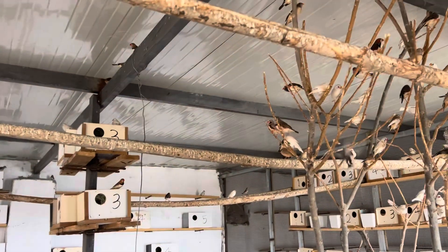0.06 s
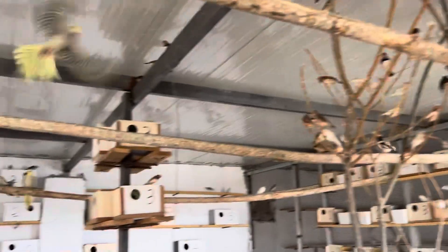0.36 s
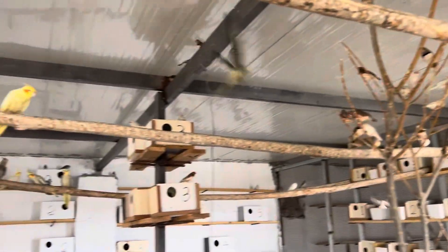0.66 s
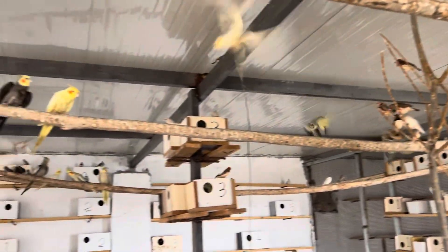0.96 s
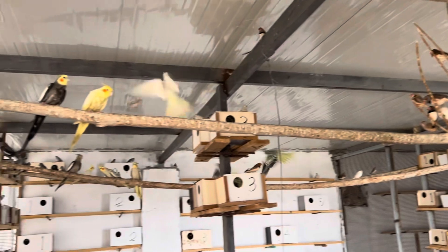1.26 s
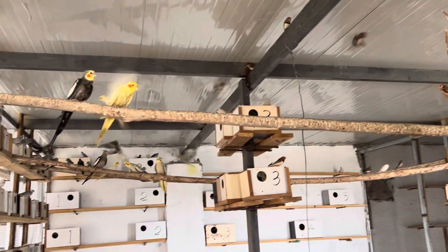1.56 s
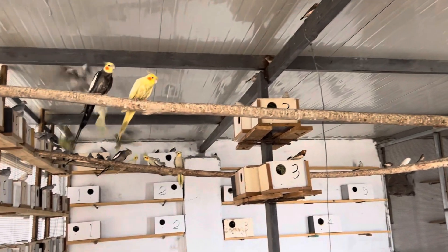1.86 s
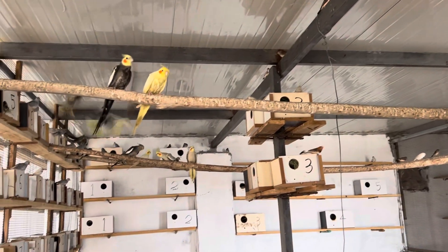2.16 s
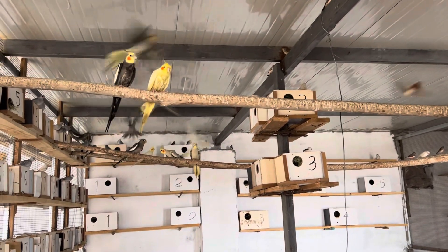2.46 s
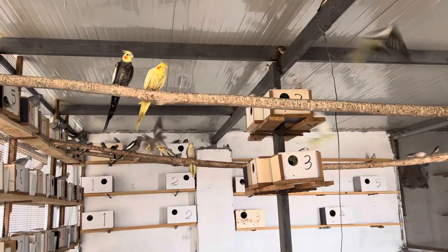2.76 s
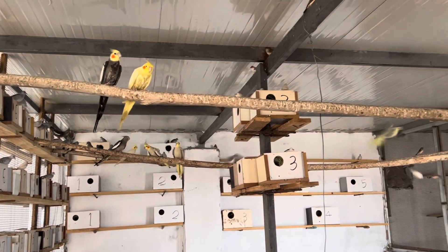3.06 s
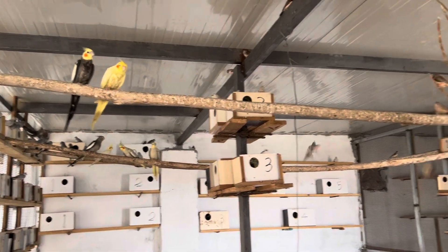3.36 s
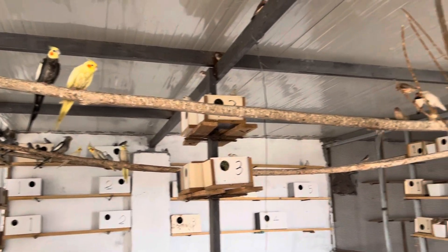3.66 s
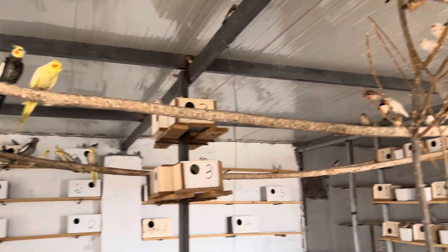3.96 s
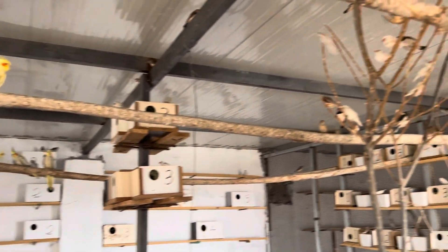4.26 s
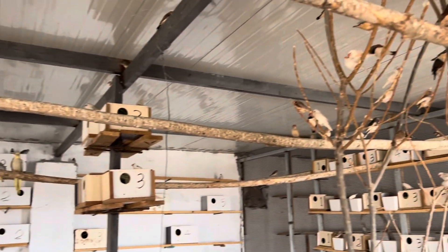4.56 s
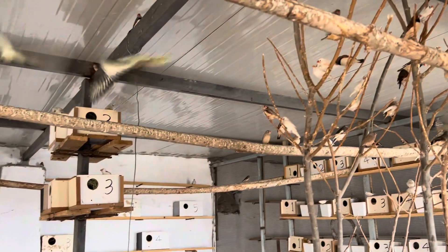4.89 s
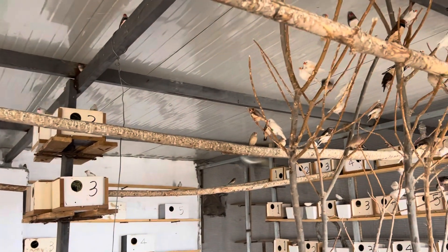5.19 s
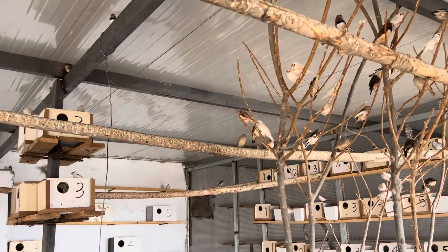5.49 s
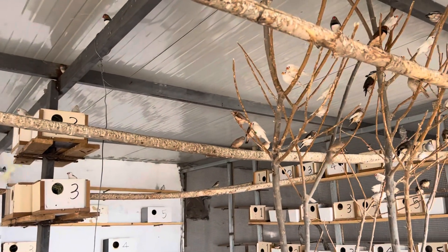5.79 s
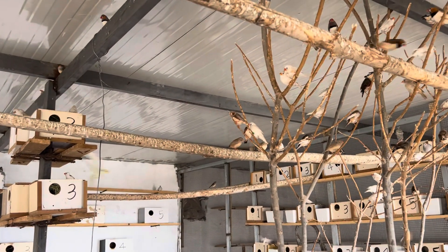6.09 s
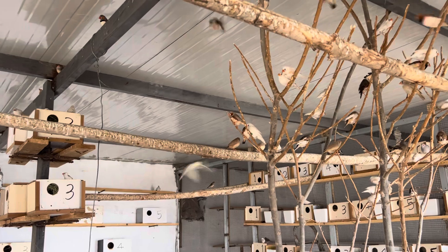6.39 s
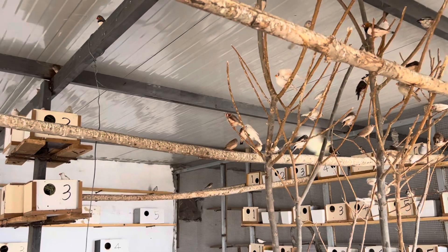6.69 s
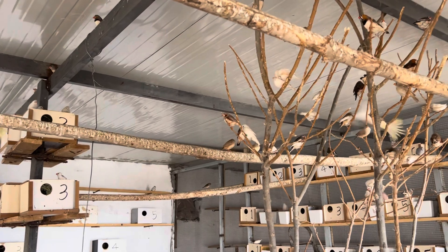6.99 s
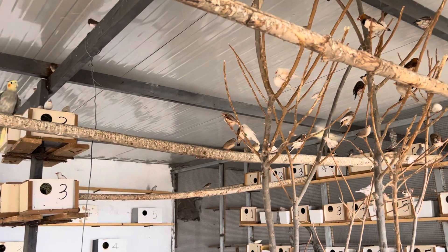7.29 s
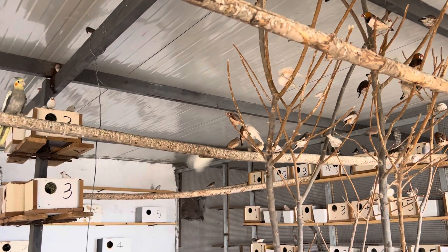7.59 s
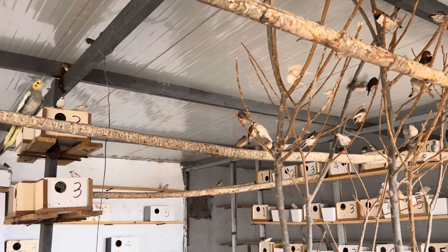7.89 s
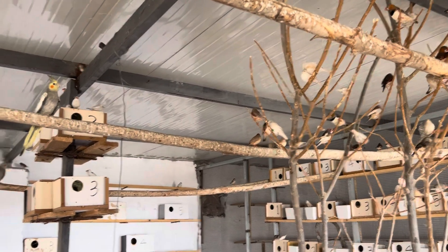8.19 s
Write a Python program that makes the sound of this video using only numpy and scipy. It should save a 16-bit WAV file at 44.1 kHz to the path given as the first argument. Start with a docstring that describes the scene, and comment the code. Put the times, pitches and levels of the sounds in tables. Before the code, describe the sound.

Many small birds call in a tin-roofed aviary, heard in stereo from among the perches, the hard walls ringing over a low rumble. Finches give soft nasal bleats and thin peeps throughout. It opens with an arched cockatiel whistle, fluttering wings and four sharp chips. Around 0.7 to 1 second come raspy screeches, another whistle, hard wingbeats and light ticks of feet on wood. A thin twitter steps down from 1.4 to 2 seconds, followed by creaky calls, screeches and more flaps. From about 2.3 to 5 seconds one bird keeps up a quick run of high, sharp chips while wings pass, with hard flaps and a tap near 4.5 seconds. After a slightly quieter moment, the loudest cockatiel whistles sound close by at 6 and 7.6 seconds, with short screeches and creaky calls around them.

```python
"""A tin-roofed aviary, the stereo microphone among the perches, hard walls ringing over a low rumble.
It opens on an arched cockatiel whistle, passing wings and four sharp chips; finches bleat and peep
throughout. Screeches break in, feet tick on wood and a twitter steps down. From 2 s to 5 s one bird
keeps up a run of chips; then come more screeches and the loudest whistles, close by, at 6 s and 7.6 s.
Every voice is a vibrating membrane in the throat; the wings are air puffed through feathers."""
import sys
import numpy as np
from scipy import signal
from scipy.fft import rfft, irfft, next_fast_len
from scipy.io import wavfile

SR = 44100
rng = np.random.default_rng(int(sys.argv[2]) if len(sys.argv) > 2 else 0)


def store_wav(level_fs):
    """Save 16-bit WAV to argv[1]."""
    pcm = np.round(np.clip(np.atleast_2d(level_fs), -1, 1) * 32767)
    wavfile.write(sys.argv[1], SR, pcm.T.astype(np.int16))


N = 367794
TOP_HZ = 15700  # upper limit of the sound


def undb(db):
    """Decibels to gain."""
    return 10 ** (np.asarray(db) / 20)


def unit(x):
    """Scale to rms 1."""
    return x / np.sqrt(np.mean(x ** 2) + 1e-18)


def read(points, hz):
    """Read (Hz, value) points on a log-frequency axis."""
    point_hz, value = np.transpose(points)
    return np.interp(np.log(np.maximum(hz, 1)), np.log(point_hz), value)


def colour(x, points):
    """Filter a sound by a curve of (Hz, dB) points."""
    n = next_fast_len(x.shape[-1], True)
    gain = undb(read(points, np.fft.rfftfreq(n, 1 / SR)))
    return irfft(rfft(x, n) * gain, n)[..., :x.shape[-1]]


def wobble(n, hz):
    """A random drift of rms 1 that turns hz times a second."""
    steps = np.arange(n) * hz / SR
    knots = np.arange(int(steps[-1]) + 2)
    own_rng = np.random.default_rng(rng.integers(2 ** 30))
    return unit(np.interp(steps, knots, own_rng.standard_normal(len(knots))))


def progress(length_s):
    """A ramp from 0 to 1 over a note, called u below."""
    return np.linspace(0, 1, max(int(length_s * SR), 64))


def swell(u, edge):
    """Soft start and end, each taking the share edge of a note."""
    return np.sin(np.pi / 2 * np.clip(np.minimum(u, 1 - u) / edge, 0, 1))


def add(track, start_s, sound):
    """Mix a sound into a track, dropping what overhangs either end."""
    start = int(start_s * SR)
    first, last = max(start, 0), min(start + len(sound), N)
    if last > first:
        track[first:last] += sound[first - start:last - start]


def syrinx(hz, partials_db):
    """The vibrating membrane in a bird's throat: harmonics of a moving pitch."""
    phase = 2 * np.pi * (np.cumsum(hz) / SR + rng.random())
    partials = (undb(db) * np.sin(k * phase) * (k * hz < TOP_HZ) for k, db in enumerate(partials_db, 1))
    return sum(partials) * np.sqrt(2)


def cockatiels(warble_hz=75, harsh_db=15, harsh_slope_db=4, near_db=-22, far_db=-32):
    """Whistles climb with a harsh warble, ring clear at the top and drop off. Returns near and far."""
    # cockatiel calls: start_s, length_s, top_hz, level_db
    whistles = [(-.1, .18, 2921, -22.5), (0.843, .17, 2850, -20.5), (2.043, 0.17, 2052, -28),
                (3.752, .12, 1910, -34), (5.608, .15, 2086, -32), (5.909, 0.17, 2660, -31),
                (6.013, 0.17, 2952, -16), (7.288, .11, 2076, -35.5), (7.497, 0.12, 2030, -28),
                (7.594, 0.17, 2982, -15.5), (7.824, 0.13, 1938, -34)]
    # course of one whistle: share_of_length, share_of_top_pitch, level_db
    arch = [(0, .62, -26), (0.141, .67, -12), (0.283, .83, -9.5), (0.427, 0.97, -5.5), (.6, 0.97, -4.5),
            (0.801, 0.99, -6.5), (0.919, .86, -6.5), (1.001, .66, -10.5)]
    # harmonics of the clear tone, lowest first: level_db
    clear_db = [-1, -22.5, -30.5, -27]
    near, far = np.zeros(N), np.zeros(N)
    arch_at, arch_pitch, arch_db = np.transpose(arch)
    for start_s, length_s, top_hz, db in whistles:
        u = progress(length_s)
        distance = np.clip((near_db - db) / (near_db - far_db), 0, 1)  # faint calls: the far wall
        along = u ** (1 + .35 * distance)  # far calls peak later
        contour = np.interp(along, arch_at, arch_pitch) ** (.88 ** distance)  # and are flatter
        climb = np.clip(1 - 2 * along, 0, 1) ** .5  # 1 at the start, 0 from mid-arch on
        warble = .037 * (.25 + 2 * climb) * np.sin(2 * np.pi * warble_hz * u * length_s)
        roughness = (.011 * (1 + 2 * climb) + .035 * distance) * wobble(len(u), 900)
        partials_db = [level + (harsh_db - harsh_slope_db * (k - 1)) * climb * (k > 0)
                       for k, level in enumerate(clear_db)]
        tone = syrinx(top_hz * contour * (1 + warble + roughness), partials_db)
        tone *= undb(db + np.interp(along, arch_at, arch_db)) * swell(u, edge=.03)
        add(near, start_s, tone * (1 - distance))
        add(far, start_s, tone * distance)
    return near, far


def wings(wingbeat_hz=15.5, uneven=.14, sharpness=2, flap_s=.029):
    """Every downstroke pushes a puff of air through the feathers."""
    # birds flying past the microphone: start_s, length_s, level_db
    flights = [(-.05, 0.51, -46.5), (0.661, 0.48, -45.5), (1.048, 1.03, -50.5), (2.022, 0.44, -46.5),
               (2.391, 0.88, -51.5), (3.454, 0.55, -51), (4.231, 0.61, -48.5), (5.599, 1, -59.5),
               (6.896, .6, -62.5)]
    # single hard wingbeats: time_s, level_db
    flaps = [(0.814, -31), (0.843, -37), (2.126, -32), (2.27, -36), (3.885, -48), (4.46, -33.5),
             (4.557, -37), (4.654, -57)]
    # spectrum of air through feathers: frequency_hz, level_db
    feathers = [(20, -20), (40, 10), (90, 6.5), (200, -3), (420, -0.5), (900, -18), (2500, -20.5),
                (8000, -10), (14000, -22)]
    push = np.zeros(N)
    for start_s, length_s, db in flights:
        u = progress(length_s)
        beat_hz = wingbeat_hz * (1 + uneven * wobble(len(u), 11.04))
        strokes = np.exp(sharpness * np.cos(2 * np.pi * np.cumsum(beat_hz) / SR))
        add(push, start_s, unit(strokes * swell(u, edge=.22)) * undb(db))
    u = progress(flap_s)
    for time_s, db in flaps:
        add(push, time_s - .008, swell(u, edge=.22) * np.exp(-u) * undb(db))
    return push * unit(colour(rng.standard_normal(N), feathers))


def chipping_bird(rise_s=.028, crack_s=.054, whistle_s=.0547, rise=.039, rasp=.065, sag=.015):
    """Each chip rises, cracks into a rasp as the voice changes register, and ends on a high whistle."""
    # the chips: crack_time_s, whistle_hz, level_db
    chips = [(-.02, 6590, -20.5), (.089, 6685, -21), (.21, 6620, -20), (.33, 6574, -22), (2.269, 6780, -20),
             (2.374, 6190, -25), (2.458, 6710, -18), (2.575, 6190, -20), (2.75, 6250, -25.5),
             (2.865, 6190, -25.5), (2.92, 7010, -25.5), (3.026, 6650, -24), (3.13, 6700, -29),
             (3.234, 6590, -25), (3.351, 6420, -21.5), (3.468, 6270, -22), (3.611, 6194, -16.5),
             (3.765, 6400, -20.5), (3.902, 6295, -20.5), (4.028, 6390, -19.5), (4.115, 6805, -18),
             (4.158, 6360, -19.5), (4.232, 6600, -20), (4.343, 6380, -19.5), (4.46, 6335, -23),
             (4.582, 6230, -21), (4.729, 6280, -22.5), (4.865, 6340, -26.5)]
    # the lower register, in which every chip begins: time_s, pitch_hz, effort_db
    low_voice = [(0, 2526, -23.5), (.2, 2440, -20), (0.328, 2390, -26.5), (2.46, 2440, -22.5),
                 (2.578, 2266, -23.5), (2.89, 2288, -26), (3.02, 2597, -25), (3.47, 2623, -22.5),
                 (3.76, 2350, -22.5), (4.12, 2394, -45), (4.23, 2407, -19.5), (4.6, 2398, -19),
                 (4.87, 2480, -17.5)]
    # harmonics of the rising note, lowest first: level_db
    rising_db = [-2.5, 7.5, -2.5, -12, -7.5]
    # effort at which that note ends in an upward flick: onset_db, full_db
    flick_range_db = (-30, -22)
    out = np.zeros(N)
    voice_s, voice_hz, voice_db = np.transpose(low_voice)
    for time_s, whistle_hz, db in chips:
        low_hz = np.interp(time_s, voice_s, voice_hz)
        effort_db = np.interp(time_s, voice_s, voice_db)
        u = progress(rise_s)
        flick = .24 * np.interp(effort_db, flick_range_db, [0, 1]) * np.exp((u - 1) / .085)
        pitch = low_hz * (1 + rise * (u - .5) + flick + .0098 * wobble(len(u), 830))
        low_note = syrinx(pitch, rising_db) * swell(u, edge=.1)
        add(out, time_s - rise_s + .003, low_note * undb(effort_db - 12.045 + 2.19 * u))

        u = progress(crack_s)
        pitch = low_hz * (1 + rasp * wobble(len(u), 1460))
        crack = syrinx(pitch, partials_db=[-9, 2.5, -25, -4.5, -7]) * swell(u, edge=.12)
        add(out, time_s - .004, crack * undb(db - 10 - 16 * u + 4.7 * wobble(len(u), 440)))

        u = progress(whistle_s)
        pitch = whistle_hz * (1 + sag * (.5 - u) + .014 * wobble(len(u), 766))
        whistle = syrinx(pitch, partials_db=[0, -23]) * swell(u, edge=.12)
        add(out, time_s, whistle * undb(db + 8 * (.5 - u)))
    return out


def rumble(flicker_db=1.9):
    """Low background of the building; only its bass is alike on both sides."""
    # room tone: frequency_hz, level_db
    spectrum = [(20, -18), (45, -0.5), (70, 3.5), (120, -4.5), (240, -14.5), (450, -15), (1000, -20.5),
                (2000, -25), (4000, -20.5), (8000, -33), (11000, -32), (16000, -82)]
    # its slow rise and fall: time_s, level_db
    levels = [(0, -47), (1.2, -46), (3.3, -46.5), (4.6, -45), (5.1, -48.5), (5.45, -48), (5.8, -47),
              (6.3, -46), (6.7, -50), (7.4, -48), (7.85, -56), (8.34, -49)]
    mid, side = (unit(colour(rng.standard_normal(N), spectrum)) * undb(flicker_db * wobble(N, 9))
                 for _ in range(2))
    side = colour(side, [(60, -29), (250, -9.5), (800, -3)])
    level_db = np.interp(np.arange(N) / SR, *np.transpose(levels))
    return np.array([mid + side, mid - side]) * undb(level_db)


def bleat(length_s, hz, fall, rough, waver=.02754, arch=.0796, flutter_db=3, harmonics=16):
    """A low buzzy arched note through a finch's small throat, which favours the high harmonics."""
    # resonance of the throat: frequency_hz, gain_db
    throat = [(500, -27), (1400, -16), (2200, -15.5), (3300, -7), (4400, -9), (5400, -13), (7000, -29),
              (10000, -33)]
    u = progress(length_s)
    unsteady = rough * wobble(len(u), 728.5) + waver * wobble(len(u), 59.82)
    pitch = hz * (1 + fall * (.5 - u)) * (1 + arch * (np.sin(np.pi * u) - .7) + unsteady)
    tone = syrinx(pitch, read(throat, np.arange(1, harmonics + 1) * pitch.mean()))
    return unit(tone * undb(flutter_db * wobble(len(u), 113))) * swell(u, edge=.2)


def finches(flock_db=-52, peep_db=-53.5, spread_db=3, turns=72):
    """Finches bleat near the microphone; further off the flock gives one bleat and one peep a turn."""
    # the nearer nasal bleats: start_s, length_s, pitch_hz, level_db
    near_bleats = [(0.569, 0.15, 800, -51), (1.258, 0.097, 514, -45.5), (4.952, .099, 990, -47.5),
                   (5.284, .16, 557.4, -44.5), (5.504, 0.14, 859, -43), (6.533, 0.072, 469, -48),
                   (7.04, 0.14, 532, -48), (7.257, 0.11, 504, -47), (7.401, .043, 683, -41),
                   (7.972, 0.033, 855, -39), (8.123, 0.14, 689, -46)]
    out = np.zeros(N)
    for start_s, length_s, hz, db in near_bleats:
        add(out, start_s, bleat(length_s, hz, fall=.09, rough=.0325) * undb(db))
    turn_s = N / SR / turns
    for turn, (bleat_at, size, height, fall, loudness, peep_at) in enumerate(rng.random((turns, 6))):
        gain = undb(spread_db * loudness)
        far_bleat = bleat(.04 + .06 * size, 500 + 700 * height, fall=.3054 * fall, rough=.015)
        add(out, (turn + bleat_at) * turn_s, far_bleat * gain * undb(flock_db))
        u = progress(.022 + .0271 * fall)
        peep_hz = (2800 + 2600 * size) * (1 + .5 * (height - .6) * u ** 2)
        peep = syrinx(peep_hz, partials_db=[0, -20]) * swell(u, edge=.32)
        add(out, (turn + peep_at) * turn_s, peep * gain * undb(peep_db))
    return out


def strained(notes, glide, partials_db, rasp_hz=1400, flutter_db=3):
    """Notes of a tight throat: the pitch glides and shakes irregularly, and the level flutters."""
    out = np.zeros(N)
    for start_s, length_s, hz, db, rasp in notes:
        u = progress(length_s)
        pitch = hz * (1 + glide * (u - .5)) * (1 + rasp * wobble(len(u), rasp_hz))
        tone = syrinx(pitch, partials_db) * undb(flutter_db * wobble(len(u), 278))
        add(out, start_s, unit(tone) * swell(u, edge=.19) * undb(db))
    return out


def creaks():
    """A tight throat draws out a rising note with many harmonics."""
    # creaking calls: start_s, length_s, pitch_hz, level_db, rasp_share_of_pitch
    notes = [(.652, 0.031, 2070, -33, 0.049), (1.974, 0.1, 2530, -27.5, 0.028),
             (2.225, 0.056, 2380, -27, 0.036), (5.595, 0.086, 2290, -44.5, 0.11),
             (6.186, .09, 2344, -31, 0.014), (7.484, 0.1, 2228, -31.5, 0.021)]
    return strained(notes, glide=.0575, partials_db=[-8, 4, 4.5, -2.5, -6, -12])


def screeches():
    """A tight throat in its high register gives one rough, sagging band."""
    # screeching calls: start_s, length_s, pitch_hz, level_db, rasp_share_of_pitch
    notes = [(.678, 0.004, 6090, -14, 0.043), (.685, 0.092, 6210, -31, 0.055),
             (.689, 0.057, 5100, -31, 0.055), (.793, 0.071, 5570, -25.5, 0.037),
             (.901, 0.086, 5320, -27, 0.057), (2.03, .065, 6360, -24, 0.075),
             (2.121, 0.087, 6520, -32.5, 0.023), (2.59, 0.084, 4316, -23.5, 0.063),
             (2.653, 0.047, 3284, -28.5, 0.015), (6.25, 0.0384, 6725, -25.5, 0.019),
             (6.254, 0.036, 4800, -31, 0.024), (6.528, .014, 4300, -54, 0.012),
             (7.54, 0.053, 6690, -25.5, .032), (7.604, 0.052, 4380, -31, 0.074)]
    return strained(notes, glide=-.025, partials_db=[0, -15])


def perch_taps(scratch_s=.018, decay_s=.001555):
    """The brief scratch of a claw or beak rings the wooden perch."""
    # feet and beaks on wood: start_s, level_db
    taps = [(0.74, -28.5), (.812, -31), (1.102, -37.5), (4.458, -29.5), (7.357, -35.5)]
    # resonances of the perch: centre_hz, width_hz, gain_db
    modes = [(480, 160, -14), (874, 570, 9), (1850, 150, -34), (4500, 11000, 8), (8900, 4000, 7)]
    blows = np.zeros(N)
    decay = np.exp(-progress(scratch_s) * scratch_s / decay_s)
    for start_s, db in taps:
        add(blows, start_s, rng.standard_normal(len(decay)) * decay * undb(db))
    return sum(undb(db) * signal.lfilter(*signal.iirpeak(hz, hz / width_hz, fs=SR), blows)
               for hz, width_hz, db in modes)


def twitter(bend=.072, rough=.0288):
    """A finch's thin notes each dip in the middle; the phrase steps down and levels off."""
    # notes of the phrase: start_s, length_s, pitch_hz, level_db
    notes = [(1.441, 0.078, 5020, -33), (1.529, 0.082, 4464, -31.5), (1.642, 0.063, 4204, -33),
             (1.759, 0.059, 4230, -35), (1.863, 0.047, 4230, -34), (1.961, 0.073, 4295, -35.5)]
    out = np.zeros(N)
    for start_s, length_s, hz, db in notes:
        u = progress(length_s)
        pitch = hz * (1 + bend * (.5 - np.sin(np.pi * u)) + rough * wobble(len(u), 506))
        add(out, start_s, syrinx(pitch, partials_db=[0, -13, -26]) * swell(u, edge=.2) * undb(db))
    return out


def aviary(x, tail_db, left_db, early_db, width, early_decay_s, reflections=14):
    """Direct sound, a few hard reflections off roof and walls, then a dense tail."""
    # time the shed takes to die away by 60 dB: frequency_hz, t60_s
    ring_times = [(200, 0.61), (1500, 0.72), (3000, 0.73), (6500, 0.58), (12000, 0.43)]
    t = np.arange(SR) / SR
    centres_hz = np.array(ring_times)[:, 0]
    noise = rfft(rng.standard_normal((2, SR)))  # one second long, so bins are 1 Hz apart
    tail = 0
    for share, (_, t60_s) in zip(np.eye(len(centres_hz)), ring_times):
        band = read(np.c_[centres_hz, share], np.arange(noise.shape[1]))
        tail = tail + irfft(noise * band, SR) * np.exp(-np.log(1000) * t / t60_s)
    tail *= np.clip(t / .0077, 0, 1)
    early = np.zeros((2, SR))
    for channel in early:
        lag_s = rng.uniform(.003, .06, reflections)
        polarity = rng.choice([-1, 1], reflections)
        channel[(lag_s * SR).astype(int)] = polarity * np.exp(-lag_s / early_decay_s)
    mid, side = (unit(tail) * undb(tail_db) + unit(early) * undb(early_db)) / np.sqrt(SR)
    response = np.array([mid + width * side, mid - width * side])
    response[:, 0] += 1  # the direct sound
    response /= np.sqrt(np.sum(response ** 2) / 2)
    balance = undb(np.array([[left_db], [-left_db]]) / 2)
    return signal.fftconvolve(x[None], response, axes=1)[:, :N] * balance


def scene():
    """Each group calls from its own perch into the same shed; the far ones are mostly reflections."""
    near_whistles, far_whistles = cockatiels()
    whistles = aviary(near_whistles,
                      tail_db=-2.5, left_db=1, early_db=-.5, width=.52, early_decay_s=.014)
    chips = aviary(chipping_bird(), tail_db=-.5, left_db=2, early_db=-5, width=.58, early_decay_s=.014)
    calls = aviary(creaks() + screeches() + twitter(),
                   tail_db=1.5, left_db=1.5, early_db=-5, width=.75, early_decay_s=.052)
    flock = aviary(finches() + far_whistles,
                   tail_db=6, left_db=1.5, early_db=9.5, width=.54, early_decay_s=.0083)
    movement = aviary(wings() + perch_taps(),
                      tail_db=-5, left_db=.5, early_db=-1.5, width=.23, early_decay_s=.03)
    return (whistles * undb(7) + chips * undb(-1.5) + calls * undb(3.5)
            + flock * undb(7.5) + movement * undb(3.5) + rumble() * undb(2.5))


def record(dry):
    """Sound reaches the left port just before the right; the treble is notched and the top is dull."""
    # imbalance of the two ports: frequency_hz, left_minus_right_db
    port_balance = [(300, -.5), (2500, -0.5), (4800, -1), (6400, 4), (8000, -1.3), (9500, -0.9)]
    # treble colour, a deep notch near 10 kHz and a dull top above 13 kHz: frequency_hz, gain_db
    treble_colour = [(1000, -0.5), (9300, 1), (10300, -22.5), (12000, -2), (13200, -9), (14200, -21)]
    port_lag_s = 2.2e-5
    n = next_fast_len(N, True)
    hz = np.fft.rfftfreq(n, 1 / SR)
    left = undb(read(port_balance, hz) / 2) * np.exp(1j * np.pi * hz * port_lag_s)
    response = np.array([left, 1 / left]) * undb(read(treble_colour, hz))
    ports = irfft(rfft(dry, n) * response, n)[:, :N]
    top_cut = signal.ellip(8, .2, 70, TOP_HZ, fs=SR, output="sos")
    return signal.sosfilt(top_cut, ports)


dry = scene()
out = record(dry)
store_wav(out)
```